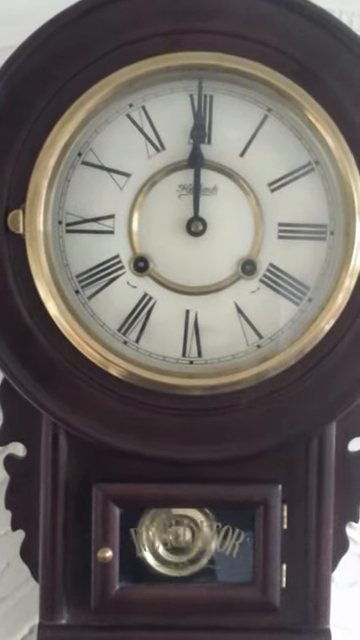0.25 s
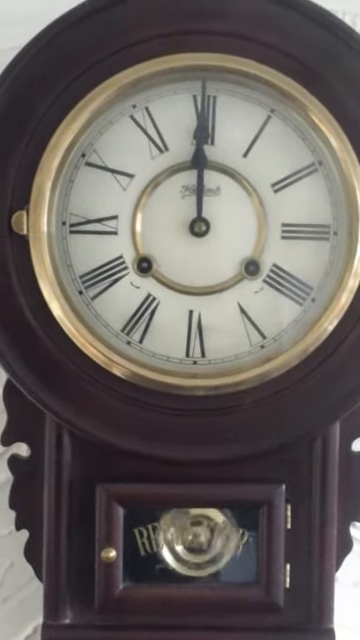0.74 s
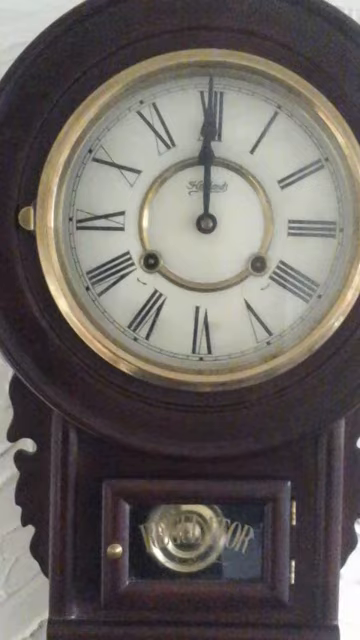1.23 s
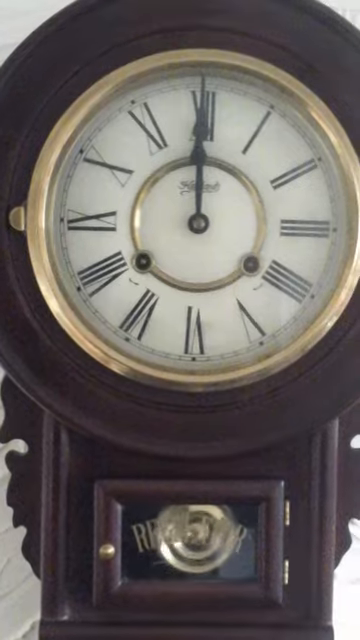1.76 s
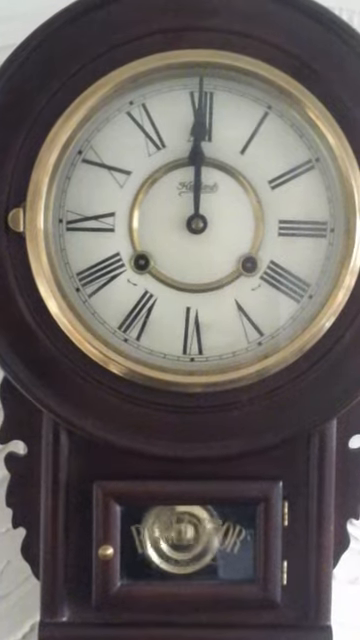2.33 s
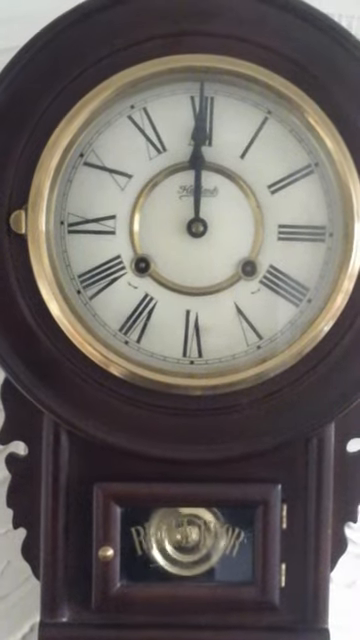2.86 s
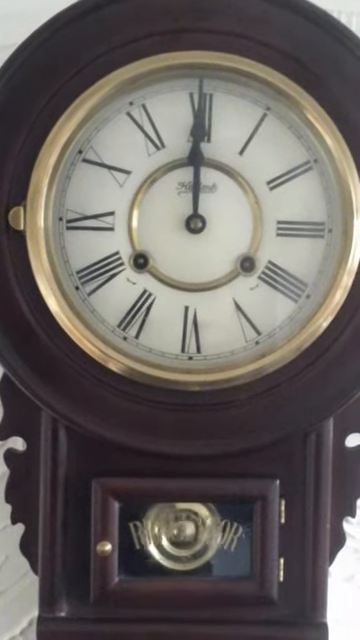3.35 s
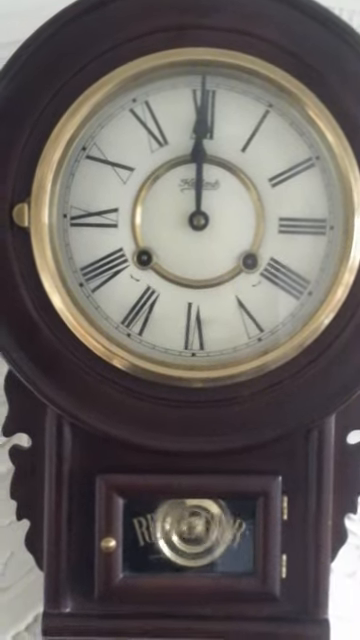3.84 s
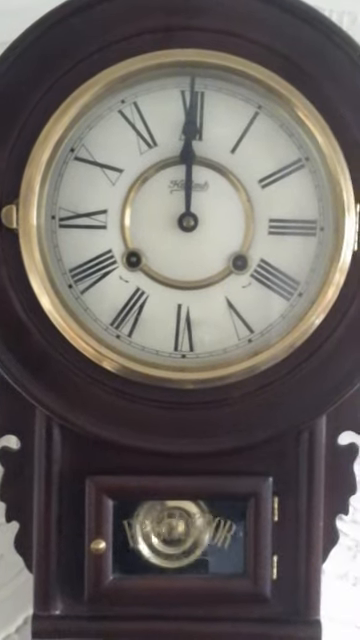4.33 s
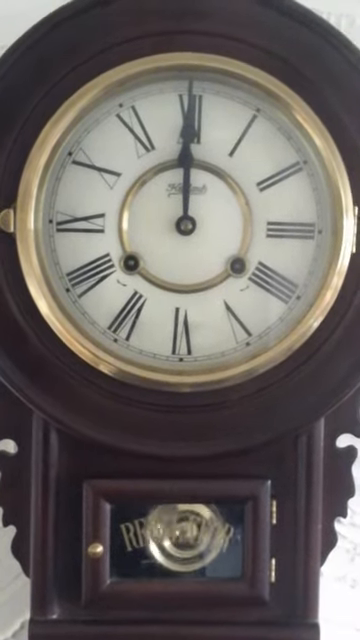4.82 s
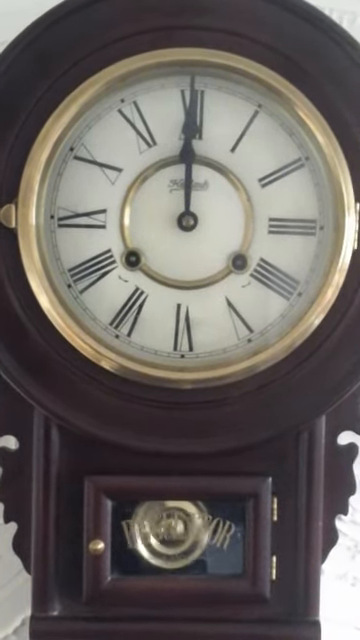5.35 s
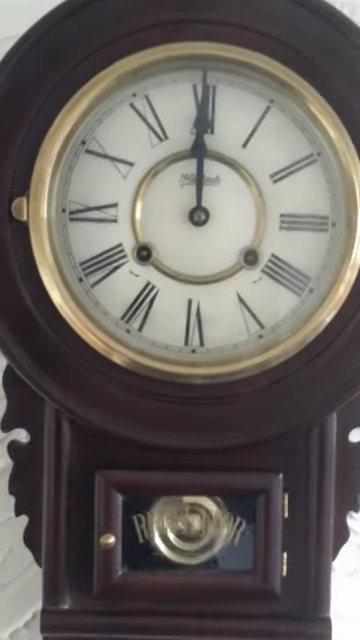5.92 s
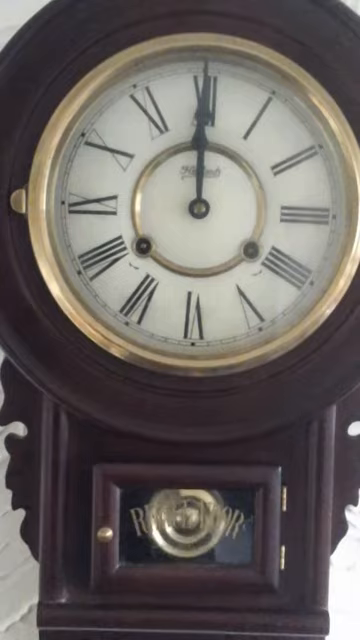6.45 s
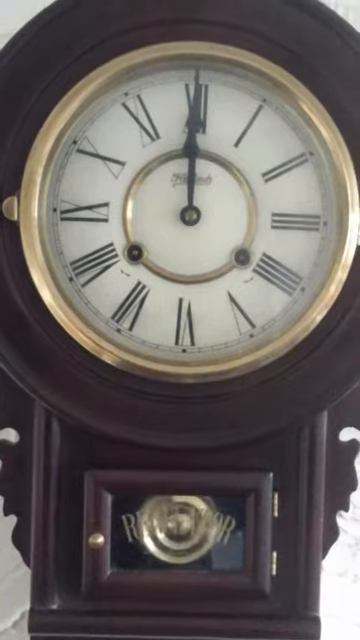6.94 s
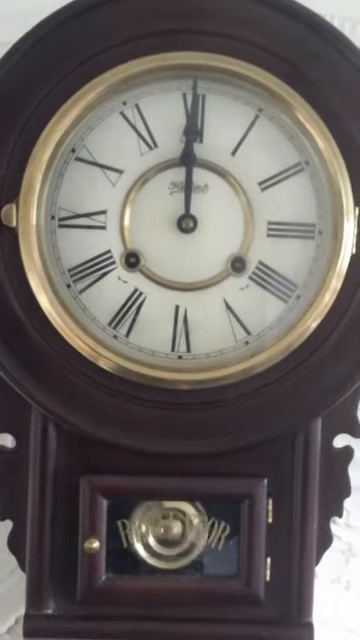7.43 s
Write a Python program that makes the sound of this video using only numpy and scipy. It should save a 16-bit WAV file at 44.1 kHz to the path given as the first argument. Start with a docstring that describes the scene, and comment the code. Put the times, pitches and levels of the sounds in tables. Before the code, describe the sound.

In a quiet, lightly reverberant room, an old wooden wall clock goes tick, tock throughout, near the microphone and in mono. Each beat is a tiny cluster of hard metal contacts followed by a short brass and case ring. Behind it are a steady low appliance hum, soft rumble and hiss, with scattered tiny lens clicks and short thin focusing whirrs.

```python
"""A wooden pendulum wall clock ticks and tocks, close by in a quiet room: each escapement tooth strikes a
pallet in a few quick contacts (noise bursts) and rings brass movement and case (decaying sine modes). A camera
focus drive clicks and whirrs faintly in windowed sine blips. Behind lie a low hum of wavering sines and rumble
and hiss of shaped noise. Mono."""
import sys
import numpy as np
from scipy import signal
from scipy.fft import rfft, irfft
from scipy.io import wavfile

SR = 44100
rng = np.random.default_rng(int(sys.argv[2]) if len(sys.argv) > 2 else 0)


def file_out(sig):
    """Save sig as 16-bit WAV at sys.argv[1]."""
    # one column per channel
    cols = np.atleast_2d(sig).T
    # limit, then scale
    lim = np.clip(cols, -1, 1)
    pcm = np.round(lim * 32767).astype(np.int16)
    wavfile.write(sys.argv[1], SR, pcm)


N = 338688

# room air and hiss, relative density: (frequency [Hz], level [dB])
AIR_SPECTRUM = [(12, -22), (22, -14), (40, -5), (75, -7), (125, -7), (260, -6), (340, -7), (420, -5.5),
                (650, -10.5), (2000, -14.5), (4500, -16), (5700, -12), (7200, -17), (15000, -17.5)]
# standing waves lifting the rumble: (centre [Hz], half width [Hz], lift [dB])
STANDING_WAVES = [(63.5, 4, 8), (82.6, 2.5, 9), (184.6, 13.4, 6.5), (228.4, 3.7, 6), (309, 22, 11.5)]
AIR_DB_RMS = -39
# appliance lines, before the waver: (frequency [Hz], level [dB rms])
HUM_LINES = [(41.1, -47.5), (48.9, -52), (97.7, -54.5), (100, -52.5), (344, -60.5), (489.5, -58.5)]

# lone lens steps: (time [s])
FOCUS_CLICKS = [.1095, .9595, 1.9995, 2.5995, 2.9497, 3.0997, 4.9397, 5.0598, 5.36, 5.41, 5.73, 5.8, 6.6204,
                6.7, 7.0402]
# lens hunts, quick out and slow back: (start [s], length of the way out [s])
FOCUS_HUNTS = [(1.505, 0.14), (4.492, 0.16), (6.597, .12)]
HUNT_S = 0.291  # out and back together
STEP_HZ, STEP_SPREAD_HZ = 5530, 110  # spread within runs only
CLICK_DB, FAINT_CLICK_DB, FAINT_CLICKS_PER_S = -21.5, -29, 2
OUT_DB, OUT_STEPS_PER_S = -35, 530
BACK_DB, BACK_STEPS_PER_S = -29.5, 217
RUN_ENDS_DB = -1.5  # at both ends, against mid-run

# modes of case and movement, relative levels:
# (frequency [Hz], level from entry pallet [dB], level from exit pallet [dB], t60 [s])
CLOCK_MODES = [(443, -13, -12, 0.3), (617, -9, -10, 0.23), (639, -10, -10, 0.26), (693, -10, -10, 0.23),
               (874, -18, -6, 0.21), (927, -10, -6, 0.19), (1193, -14, -13, 0.17), (1285, 1, -6, 0.11),
               (1406, -19, 1, 0.13), (1525, -5, -7, 0.13), (1619, -1, -3, 0.08), (1707, -4, -13, 0.11),
               (1771, -11, -32, 0.14), (2186, -12, 0, 0.12), (2263, -5, -8, 0.13), (2602, -8, -4, 0.11),
               (2692, -20, -4, 0.16), (2763, -17, 3.5, 0.13), (3039, -31, -7, 0.18), (3118, -9, 1, 0.12),
               (3536, -8, -2, 0.09), (3657, -9, -8, 0.13), (3817, 9, 6, 0.04), (3934, -6, -9, 0.14),
               (4298, -7, 4, 0.08), (4748, 4, -8, 0.12), (4852, 5, -24, 0.09), (4912, 5, -9, 0.08),
               (5015, 4, -1, 0.06), (5742, -3, 1, 0.08)]
# tooth contacts, relative levels: (time after the beat [s], level [dB])
TICK_CONTACTS = [(.0003, -5.5), (.0012, -1.5), (.0042, 0.5)]
TOCK_CONTACTS = [(.0005, 0.42), (.0028, -0.4), (.0046, -2)]
# spectrum of the clatter between the modes: (frequency [Hz], gain [dB])
TICK_COLOUR = [(200, -45), (550, -15), (900, -8.5), (1500, -8), (1950, -11), (2900, -12.5), (3800, 0),
               (4350, -5), (4900, 4), (5350, -13), (6100, -4.5), (6900, -14), (9000, -23.5), (14000, -41)]
TOCK_COLOUR = [(200, -53), (550, -12.5), (900, -7), (1500, -2.5), (1900, -7), (2750, 0), (3300, -1),
               (3750, -0.5), (4400, 0), (5000, -6), (6100, -2.5), (6800, -9), (7800, -6.5), (14000, -33)]
# decay of the room: (frequency [Hz], t60 [s])
ROOM_T60 = [(300, 0.18), (1500, 0.36), (5000, 0.31), (10000, 0.13)]
BEAT_S = .51127  # mean spacing of tick and tock
# ticks come early and tocks late by the limp; it shrinks, and sways as the escape wheel turns
LIMP_S, LIMP_SHRINK_S_PER_S = .00863, .00084
SWAY_S, SWAY_PERIOD_S, SWAY_PEAK_AT_S = .0016, 4.35, 1.66
# landing hardness: (level at the start [dB], gain per second [dB/s])
TICK_HARDNESS, TOCK_HARDNESS = (-1.25, -0.045), (-3.03, 0.62)
OPENING_TICK_DB = -1.5  # the first tick, its onset cut off, is softer

EDGE_HZ = 14650


def amp(db):
    """Decibels to gain."""
    return 10 ** (np.asarray(db) / 20)


def evened(x):
    """Scales to rms 1."""
    return x / np.sqrt(np.mean(x ** 2) + 1e-20)


def read(points, hz):
    """Reads a table on a log-frequency axis."""
    f, value = np.transpose(points)
    return np.interp(np.log(hz + 1), np.log(f + 1), value)


def add(mix, s, sound):
    """Adds a sound at time s; what falls outside is dropped."""
    at = round(s * SR)
    sound = sound[max(-at, 0):]
    part = mix[max(at, 0):][:len(sound)]
    part += sound[:len(part)]


def coloured(x, colour, size=2048):
    """Minimum-phase filter with the given spectrum."""
    hz = abs(np.fft.fftfreq(size, 1 / SR))
    log_gain = np.log(amp(read(colour, hz)))
    spectrum = np.exp(np.conj(signal.hilbert(log_gain)))
    taps = np.fft.ifft(spectrum).real
    return signal.fftconvolve(x, taps)[:len(x)]


def air():
    """Steady noise: rumble lifted at the room's standing waves, under an even hiss."""
    hz = np.fft.rfftfreq(N, 1 / SR)
    level_db = read(AIR_SPECTRUM, hz)
    for centre_hz, half_width_hz, lift_db in STANDING_WAVES:
        level_db += lift_db / (1 + ((hz - centre_hz) / half_width_hz) ** 2)
    noise = irfft(rfft(rng.standard_normal(N)) * amp(level_db), N)
    return amp(AIR_DB_RMS) * evened(noise)


def hum():
    """Low sine lines of a distant appliance, each wavering slowly in level."""
    t, out = np.arange(N) / SR, np.zeros(N)
    for hz, db in HUM_LINES:
        waver = 1 + .16 * evened(signal.resample(rng.standard_normal(16), N))
        line = np.sin(2 * np.pi * (hz * t + rng.random()))
        out += np.sqrt(2) * amp(db) * waver * line
    return out


def lens_step(hz, length_s):
    """One lens step: a sine blip of random phase under a sin-squared window."""
    t = np.arange(0, length_s, 1 / SR)
    window = np.sin(np.pi * t / length_s) ** 2
    return window * np.sin(2 * np.pi * (hz * t + rng.random()))


def lens_run(length_s, db, steps_per_s):
    """Quick, slightly uneven lens steps fuse into a whirr that swells and falls."""
    out = np.zeros(SR)
    for s in np.arange(0, length_s, 1 / steps_per_s):
        swell_db = RUN_ENDS_DB * (2 * s / length_s - 1) ** 2
        step = lens_step(STEP_HZ + STEP_SPREAD_HZ * rng.standard_normal(), length_s=0.0019)
        jittered_s = s + 0.00031 * rng.standard_normal()
        add(out, jittered_s, amp(db + swell_db + 1.6 * rng.standard_normal()) * step)
    return out


def focus_drive():
    """Lone steps click, some faint and at random; a hunt whirrs out and, louder, back."""
    out = np.zeros(N)
    for s in FOCUS_CLICKS:
        add(out, s, amp(CLICK_DB) * lens_step(STEP_HZ, length_s=0.0015))
    for start_s, out_s in FOCUS_HUNTS:
        add(out, start_s, lens_run(out_s, OUT_DB, OUT_STEPS_PER_S))
        add(out, start_s + out_s, lens_run(HUNT_S - out_s, BACK_DB, BACK_STEPS_PER_S))
    faint_s = np.flatnonzero(rng.random(N) < FAINT_CLICKS_PER_S / SR) / SR
    for s in faint_s:
        add(out, s, amp(FAINT_CLICK_DB) * lens_step(STEP_HZ, length_s=0.0012))
    return out


def echoes(t60, size):
    """Dense random reflections of energy 1 that die band by band."""
    hz, t, z = signal.stft(rng.standard_normal(size), SR, nperseg=256)
    decay = amp(-60 * t / read(t60, hz)[:, None])
    tail = signal.istft(z * decay, SR, nperseg=256)[1][:size]
    return tail / np.linalg.norm(tail)


def burst(t, t60_s, rise_s=0.0005):
    """Decaying random-sign noise of energy 1, standing for a crowd of overlapping modes."""
    envelope = amp(-60 * t / t60_s) * (1 - np.exp(-t / rise_s))
    x = rng.choice([-1, 1], len(t)) * envelope
    return x / np.linalg.norm(x)


def swings(side, hardness):
    """Rows (time [s], strength [dB], hardness [dB]), one per full swing; side 0 entry, 1 exit."""
    s = np.arange(side * BEAT_S, N / SR, 2 * BEAT_S)
    sway = SWAY_S * np.cos(2 * np.pi * (s - SWAY_PEAK_AT_S) / SWAY_PERIOD_S)
    limp = LIMP_S - LIMP_SHRINK_S_PER_S * s + sway
    beat_s = s + limp if side else s - limp
    start_db, db_per_s = hardness
    return zip(beat_s, OPENING_TICK_DB * (s == 0), start_db + db_per_s * s)


def pallet(beats, contacts, colour, column, ring_db, crack_db, case_db, room_db,
           crack_t60_s, case_t60_s, ring_start_s, build_s, vary, size=16384):
    """Tooth contacts, case and room clatter over ringing modes; vary is the share new each beat."""
    t, out = np.arange(size) / SR, np.zeros(N)
    modes = np.array(CLOCK_MODES)
    hz, level_db, t60_s = modes[:, :1], modes[:, column, None], modes[:, 3:]
    # modes start together: close pairs peak at once, then beat
    age_s = np.maximum(t - ring_start_s, 0)
    envelopes = amp(level_db - 60 * age_s / t60_s) * (1 - np.exp(-age_s / build_s))
    rings = envelopes * np.sin(2 * np.pi * hz * age_s)
    cracks = [burst(t, crack_t60_s) for _ in contacts]
    case, room = burst(t, case_t60_s), echoes(ROOM_T60, size)
    same_gain, new_gain = np.sqrt(1 - vary), np.sqrt(vary)
    for s, db, hard_db in beats:
        clatter = np.zeros(size)
        for (delay_s, contact_db), crack in zip(contacts, cracks):
            contact_s = delay_s + .00015 * vary * rng.standard_normal()
            contact_gain = amp(crack_db + contact_db + rng.standard_normal())
            add(clatter, contact_s, contact_gain * crack)
        # sound bounces inside the case, then returns from the walls
        case_now = same_gain * case + new_gain * burst(t, case_t60_s)
        room_now = same_gain * room + new_gain * echoes(ROOM_T60, size)
        add(clatter, .003, amp(case_db) * case_now)
        add(clatter, .011, amp(room_db) * room_now)
        ring = amp(ring_db + 5.9 * vary * rng.standard_normal(len(modes))) @ rings
        # harder landing: less wooden knock, more brassy ring
        landing = [(700, db - hard_db), (1400, db + hard_db / 2), (2700, db + hard_db), (5000, db)]
        add(out, s, coloured(coloured(clatter, colour) + ring, landing))
    return out


def clock():
    """Entry and exit pallets alternate: a bright, compact tick and a woodier tock."""
    tick = pallet(swings(0, TICK_HARDNESS), TICK_CONTACTS, TICK_COLOUR, column=1,
                  ring_db=-28.5, crack_db=13.0, case_db=2.0, room_db=9.5,
                  crack_t60_s=0.012, case_t60_s=0.17, ring_start_s=.0028, build_s=0.00027, vary=0.18)
    tock = pallet(swings(1, TOCK_HARDNESS), TOCK_CONTACTS, TOCK_COLOUR, column=2,
                  ring_db=-28.0, crack_db=5.0, case_db=5.5, room_db=7.5,
                  crack_t60_s=0.017, case_t60_s=0.054, ring_start_s=0.000808, build_s=0.0017, vary=.33)
    return tick + tock


def scene():
    """All sources summed to mono, fed to both channels."""
    mono = air() + hum() + focus_drive() + clock()
    return np.array([mono, mono])


def record(dry):
    """Band limit: a steep linear-phase low-pass at EDGE_HZ."""
    taps = signal.firwin(511, EDGE_HZ, window=("kaiser", 9), fs=SR)
    return signal.oaconvolve(dry, taps[None], "same")


dry = scene()
out = record(dry)
file_out(out)
```